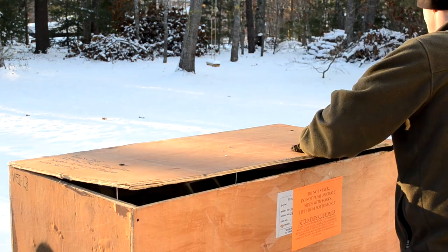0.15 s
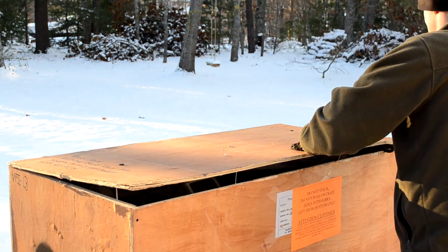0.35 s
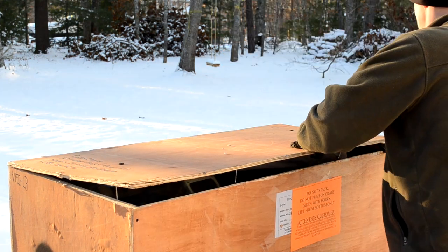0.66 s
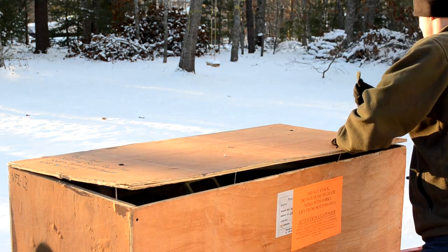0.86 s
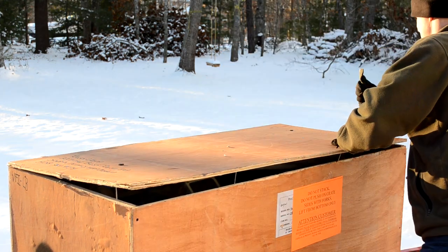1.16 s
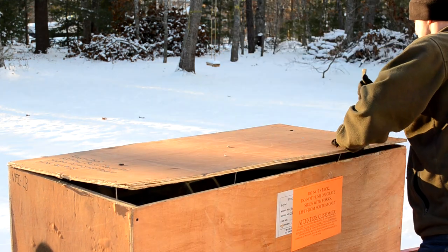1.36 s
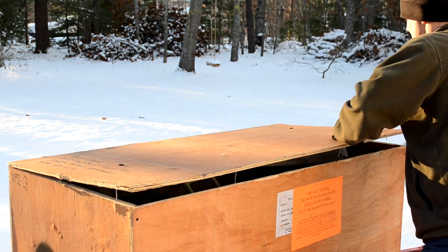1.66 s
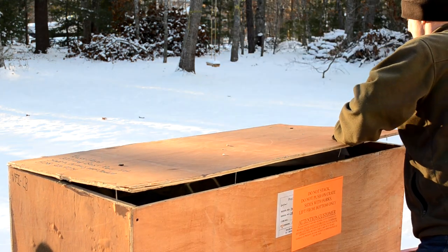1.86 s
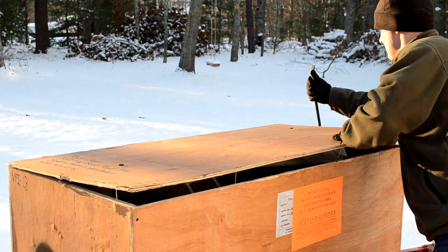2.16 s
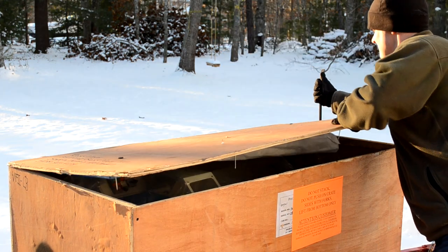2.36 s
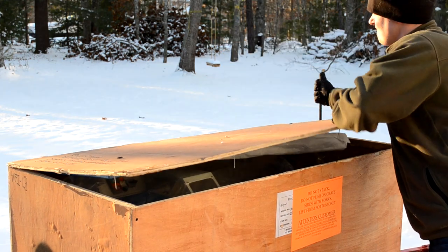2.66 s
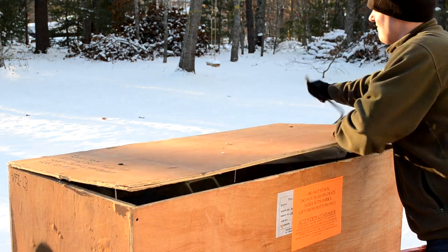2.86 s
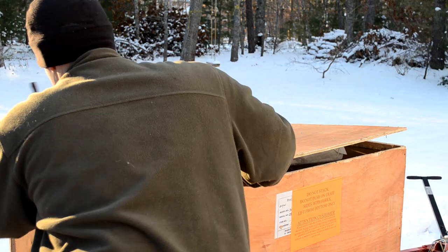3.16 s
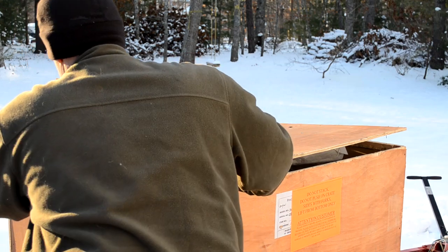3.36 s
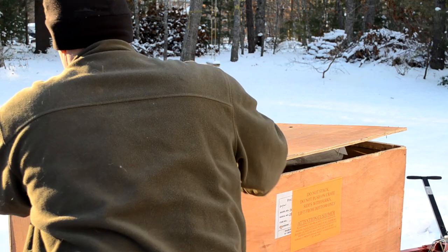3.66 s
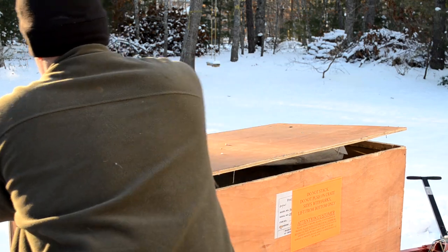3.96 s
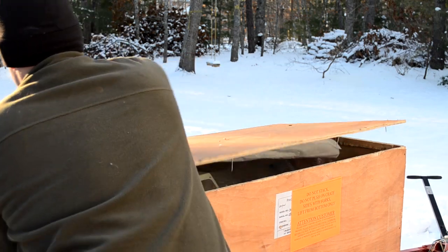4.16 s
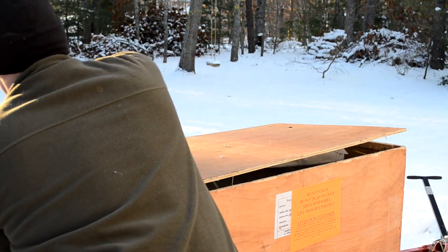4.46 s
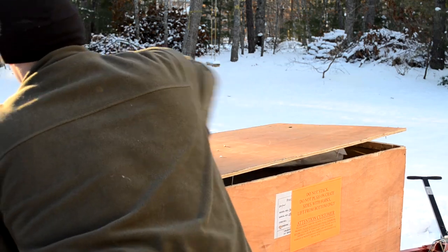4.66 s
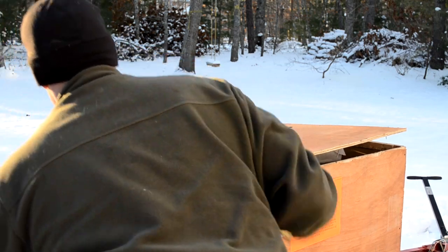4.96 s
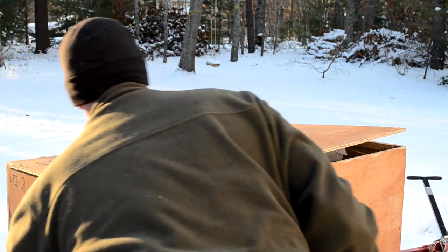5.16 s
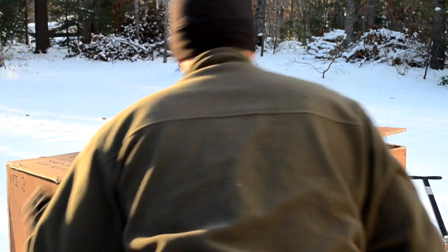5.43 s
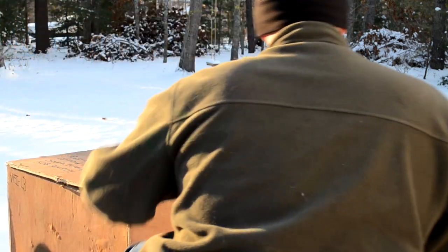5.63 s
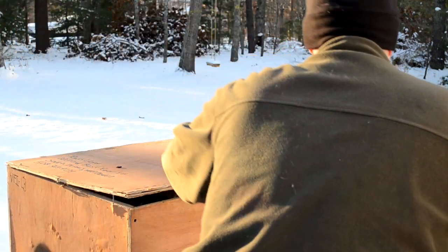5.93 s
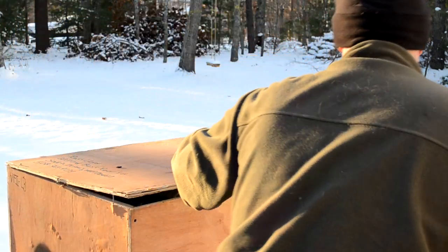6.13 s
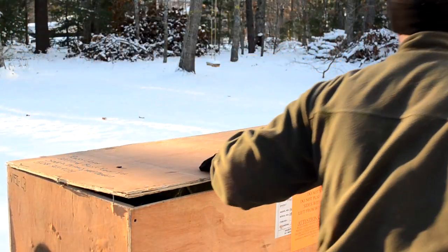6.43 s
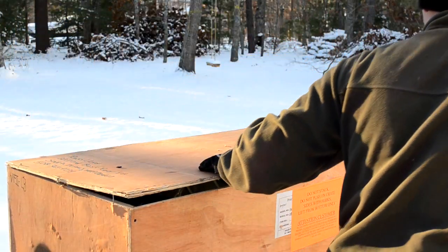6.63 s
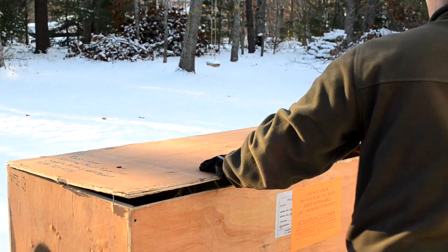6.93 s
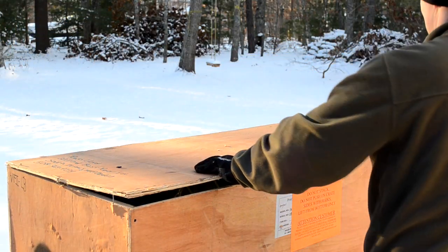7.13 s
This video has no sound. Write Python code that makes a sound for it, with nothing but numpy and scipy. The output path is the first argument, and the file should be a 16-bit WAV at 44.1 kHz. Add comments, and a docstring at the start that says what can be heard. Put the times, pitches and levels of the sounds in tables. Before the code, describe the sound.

Hollow wooden knocks, short creaking groans and gritty rubbing come from a large box lid being levered, close to a single mono microphone outdoors. The work comes in uneven bursts with pauses, over soft distant tyre roar. Late on, a metal bar slams onto the loose lid, clanks and bounces rapidly, making it rattle; a short dull tail fades into quiet handling taps.

```python
"""Prying a crate lid

A steel bar pries a plywood lid loose in a yard: knocks ring boom and panel modes, with noise cracks.
Slipping nails groan as uneven low tones and squeak as wavering sines; scrapes are grains of friction noise.
The bar drops on the lid, bounces and rings in sine modes while the loose lid chatters as lumpy noise.
A distant car swells and fades as coloured noise; crate walls and trees scatter back a dull noise tail.
"""
import sys
import numpy as np
from scipy import signal
from scipy.fft import rfft, irfft, next_fast_len
from scipy.io import wavfile
from scipy.ndimage import uniform_filter1d

SR = 44100
rng = np.random.default_rng(int(sys.argv[2]) if len(sys.argv) > 2 else 0)


def transcribe(signal):
    """Save signal, clipped to [-1, 1], as a 16-bit WAV file at the path in sys.argv[1]."""
    frames = np.atleast_2d(signal).T
    limited = np.clip(frames, -1, 1)
    pcm = np.round(limited * 32767).astype(np.int16)
    wavfile.write(sys.argv[1], SR, pcm)


N = 321489


def undb(db):
    """Decibels to amplitude ratio."""
    return 10 ** (np.asarray(db) / 20)


def unit(x):
    """Scale to rms 1."""
    return x / np.sqrt(np.mean(x ** 2))


def peak(x, db):
    """Scale to a peak level in dB."""
    return x * undb(db) / np.max(np.abs(x))


def noise(length=N):
    """White noise."""
    return rng.standard_normal(length)


def colour(x, shape):
    """Filter by (freq_hz, gain_db) points, log-frequency interpolated, -90 dB outside; rms 1."""
    point_hz, point_db = np.transpose(shape)
    size = next_fast_len(len(x))
    bin_hz = np.maximum(np.arange(size // 2 + 1) * SR / size, 1)
    gain_db = np.interp(np.log(bin_hz), np.log(point_hz), point_db, -90, -90)
    return unit(irfft(rfft(x, size) * undb(gain_db), size)[:len(x)])


def walk(rate_hz):
    """Random levels, one per 1 / rate_hz, joined by slews; spread a little under 1."""
    step = int(SR / rate_hz)
    held = np.repeat(noise(N // step + 1), step)
    return uniform_filter1d(held, step)[:N]


def fade(t60_s, length):
    """Exponential decay, 60 dB in t60_s."""
    return np.exp(-np.log(1000) * np.arange(length) / SR / t60_s)


def ring(modes, share_db, stretch, length, phase=0):
    """Decaying sines of one blow; modes are (freq_hz, level_db, t60_s), stretch scales t60_s."""
    t = np.arange(length) / SR
    out = np.zeros(length)
    for (hz, db, t60_s), share, start in zip(modes, share_db, phase + np.zeros(len(modes))):
        out += undb(db + share) * np.sin(2 * np.pi * hz * t + start) * fade(stretch * t60_s, length)
    return out


def add(out, start_s, x):
    """Mix x into out at start_s."""
    i = int(start_s * SR)
    out[i:i + len(x)] += x[:len(out) - i]


def swells(table, rise_db_s, fall_db_s, rest_db=-120):
    """Events (start_s, hold_s, level_db, ..) over a resting level; other columns are power-weighted means."""
    t = np.arange(0, N, 32) / SR
    start_s, hold_s, peak_db, *columns = np.array(table, float).T[:, :, None]
    rise_db = rise_db_s * np.maximum(start_s - t, 0)
    fall_db = fall_db_s * np.maximum(t - start_s - hold_s, 0)
    power = undb(2 * (peak_db - rise_db - fall_db)) + 1e-30
    total = power.sum(axis=0)
    slow = [10 * np.log10(total + undb(2 * rest_db))]
    slow += [(power * c).sum(axis=0) / total for c in columns]
    return [np.interp(np.arange(N) / SR, t, c) for c in slow]


# distant car: time_s, level_db
CAR_LEVEL = [(0, -48), (1, -52.5), (2, -53), (2.6, -50), (3, -45), (3.5, -40.5), (4, -38), (4.5, -39),
             (5, -41.5), (5.7, -43), (6.2, -43.5), (6.7, -46.5), (7.29, -45.5)]
# tyre roar spectrum: freq_hz, gain_db
ROAD_SPECTRUM = [(18, -52), (30, 3.5), (112, -16.5), (145, -14), (384, -14.5), (473, -12.5), (760, -4.5),
                 (1010, -7), (1280, -8), (3310, -37.5), (4080, -45.5), (12300, -63), (16000, -80)]
# quiet yard spectrum: freq_hz, gain_db
YARD_SPECTRUM = [(15, -39), (25, 4), (64, -30), (123, -22), (256, -12.5), (1020, -27), (1370, -10),
                 (2220, -28), (11000, -54), (16000, -53)]
YARD_DB = -60


def outdoors():
    """Tyre roar as coloured noise that swells and flickers, over steady yard noise."""
    time_s, level_db = np.transpose(CAR_LEVEL)
    car_db = np.interp(np.arange(N) / SR, time_s, level_db)
    road = undb(car_db + 1.0 * walk(3.066)) * colour(noise(), ROAD_SPECTRUM)
    return road + undb(YARD_DB) * colour(noise(), YARD_SPECTRUM)


# lid groans as a nail slips: start_s, hold_s, level_db, slip_hz, second_mode_db, roughness_0_1
NAIL_GROANS = [(0.0, 0.025, -45, 123, -2.5, 0.55), (0.18, 0.036, -50, 125, 12, 0.44),
               (0.335, 0.038, -40.5, 112, -1, 0.53), (0.4, 0.028, -48, 119.8, 4, 0.28),
               (0.47, 0.073, -38.5, 128, 1, .35), (0.6, .05, -46, 136.1, -8, 0.7),
               (0.71, 0.024, -53.5, 126, 4.5, 0.53), (0.88, 0.053, -41.5, 135.2, 4.5, 0.77),
               (0.97, 0.046, -50, 130, 0, .6), (1.06, 0.093, -46, 131.8, 0, 0.72),
               (1.3, 0.032, -51, 118.8, 3, 0.71), (1.44, .03, -49, 123, 1, 0.5),
               (1.525, 0.029, -30.5, 98.7, -4.5, 0.25), (1.575, .03, -17.5, 102.1, -5.5, 0.14),
               (1.66, 0.051, -35, 112.6, 0, 0.6), (1.73, 0.031, -31, 121, -7, .4),
               (1.8, 0.091, -48.5, 123, 2, 0.7), (2.0, 0.097, -60.5, 111.7, 3, 0.64),
               (2.2, .04, -54, 120, -1, 0.66), (2.33, 0.033, -33, 91.7, -11, 0.6),
               (2.388, 0.028, -23, 89.5, -25, 0.15), (2.48, 0.042, -35, 90.6, -22, 0.31),
               (2.6, 0.067, -48.5, 98, -20, 0.63), (2.765, 0.016, -27.5, 117.5, 2.5, 0.02),
               (2.9, 0.072, -46.5, 122.9, -8, 0.59), (3.1, .02, -34.5, 118, -6, 0.66),
               (3.21, .01, -38, 115.3, -4, 0.68), (3.26, .13, -48.5, 116.8, -2, 0.59),
               (3.55, 0.051, -60.5, 112, 12, .3), (3.66, 0.041, -49, 107.7, 1, 0.67),
               (4.14, .03, -37, 98, -12, .35), (4.22, .03, -36, 114, -9, 0.64),
               (4.3, .06, -33, 108.9, 5, 0.61), (4.4, .09, -40.5, 114.6, -0.5, 0.5),
               (4.55, .14, -49, 117.2, -9, 0.56), (4.75, 0.18, -48, 108, -15, 0.04),
               (5.62, .01, -48.5, 104, 5, 0.54), (5.99, .01, -57, 112, 7, .6),
               (6.37, .02, -51.5, 118, 6, 0.59)]
GROAN_RISE_DB_S, GROAN_FALL_DB_S, GROAN_REST_DB = 602, 378, -69


def flex():
    """Stick-slip at an uneven rate rocks the lid: a fundamental, its octave in the second mode, and rumble."""
    level_db, slip_hz, second_db, rough = swells(NAIL_GROANS, GROAN_RISE_DB_S, GROAN_FALL_DB_S, GROAN_REST_DB)
    rough = np.clip(rough, 0, 1)
    uneven_hz = slip_hz * (1 + 0.0955 * rough * walk(60))
    phase = 2 * np.pi * np.cumsum(uneven_hz) / SR
    low = colour(noise(), [(40, -2.5), (70, -14.0), (110, -3), (150, -5.5), (190, -17.5)])
    high = colour(noise(), [(150, 5), (200, 3.5), (235, -16.5), (300, 0), (450, -1), (600, -13)])
    clean = np.sqrt(2 * (1 - rough))
    first = clean * np.sin(phase) + np.sqrt(rough) * low
    second = clean * np.sin(2 * phase) + np.sqrt(rough) * high
    return undb(level_db) * (first + undb(second_db) * second)


# scrapes of edges, gloves and sleeves: start_s, hold_s, hiss_db, panel_share_db (relative to hiss)
RUBS = [(0.0, 0.014, -56.5, 11), (0.18, 0.17, -61, 8), (0.49, 0.0064, -53.5, 7), (0.7, 0.017, -58.5, 14.5),
        (0.88, 0.013, -63.5, 16.5), (1.45, 0.09, -56.5, 9), (1.59, 0.028, -45, 17),
        (1.72, 0.018, -62.5, 27), (2.27, .03, -60, 8.5), (2.33, 0.043, -52, 10.5), (2.42, 0.099, -55.5, 10),
        (2.78, 0.008, -54, 9.5), (3.06, .3, -66.5, 22), (3.56, 0.026, -52, 10.5), (3.78, 0.0082, -57, 9),
        (4.18, .01, -52, 16.5), (4.31, .02, -47, 21.5), (4.96, 0.0083, -55.5, 11), (6.0, 0.033, -68, 13),
        (6.38, 0.0096, -64, 4), (6.53, 0.019, -71.5, 14), (6.83, 0.049, -60, 11.5), (7.14, .05, -63.5, 13)]
# friction spectra, hiss, air and through the panel: freq_hz, gain_db
HISS_SPECTRUM = [(1200, -44), (2200, 7), (3000, 7), (4500, -6), (6500, -34)]
AIR_SPECTRUM = [(4000, -4), (6000, 7.5), (10000, 3), (13000, 1), (16000, -30)]
BODY_SPECTRUM = [(200, 12), (500, 13), (1200, 9.5), (2000, 4.5), (3500, -45.5)]
SCRAPE_RISE_DB_S, SCRAPE_FALL_DB_S, SCRAPE_REST_DB = 218, 172, -74
AIR_DB = -14.5  # relative to hiss


def rub():
    """Dense uneven grains of friction, heard as hiss and through the panel."""
    hiss_db, body_db = swells(RUBS, SCRAPE_RISE_DB_S, SCRAPE_FALL_DB_S, SCRAPE_REST_DB)
    grain_db = 3.8 * np.minimum(rng.exponential(size=N), 6)
    grains = noise() * undb(grain_db) * undb(0.83 * walk(120))
    hiss = colour(grains, HISS_SPECTRUM)
    air = undb(AIR_DB) * colour(grains, AIR_SPECTRUM)
    body = undb(body_db) * colour(grains, BODY_SPECTRUM)
    return undb(hiss_db) * (hiss + air + body)


# knocks on the plywood: start_s, panel_db, boom_db, crack_db, splinter_db, boom_hz, panel_hz
LID_KNOCKS = [(0.176, -37, -38.5, -40.5, -54, 184, 972), (0.187, -32, -61, -37.5, -73, 264, 630),
              (0.24, -47, -49, -44, -71, 256, 622), (0.373, -44, -45, -45.5, -57, 100, 978),
              (0.409, -38, -43, -52, -76, 237, 1030), (0.475, -34.5, -41, -44, -59, 153, 1030),
              (0.51, -40, -36, -49, -70, 145, 767), (0.659, -31.5, -44, -32, -48.5, 152, 935),
              (0.699, -32, -56, -24, -39, 430, 775), (0.846, -30, -35.5, -36, -63, 133, 605),
              (0.881, -33, -35, -49, -68, 378, 872), (0.965, -43, -48, -39, -54, 162, 861),
              (1.050, -28.5, -41, -40, -82, 141.6, 562), (1.276, -47, -49, -61, -75, 341, 762),
              (1.437, -44, -51, -38.5, -58, 423, 1660), (1.444, -32, -49, -32, -48.5, 136, 1840),
              (1.519, -30, -39, -34, -51, 97.6, 830), (1.583, -30, -26, -30, -65, 106, 549),
              (1.647, -15.5, -30.5, -31.5, -45, 282, 813), (1.654, -14.5, -42, -34, -46, 148.5, 930),
              (1.679, -23, -36, -45, -60, 243, 869), (1.703, -23, -32.5, -33, -71, 120, 732),
              (1.741, -26, -32.5, -37, -73, 113, 907), (2.012, -49, -60, -50, -58, 199, 1345),
              (2.15, -42.5, -63, -47.5, -65, 359, 1182), (2.199, -40, -50, -37.5, -45, 126, 1317),
              (2.314, -19, -34, -20.5, -47, 481, 933), (2.345, -31, -40, -44, -52, 99.6, 963),
              (2.378, -49, -32, -35, -53, 94, 1363), (2.433, -44, -40.5, -38, -57, 128, 2045),
              (2.552, -37.5, -43, -40.5, -57, 83.7, 624), (2.702, -46, -54, -49, -60, 135, 850),
              (2.745, -32, -30, -50, -64, 240, 654), (2.761, -20.5, -26, -29.5, -37.5, 446, 642),
              (2.803, -49, -42, -45, -58, 240, 854), (2.826, -51, -38, -49, -62, 470, 956),
              (2.883, -55, -47, -47, -62, 248.4, 725), (2.946, -35, -47, -47.5, -52, 92, 978),
              (3.032, -33, -40.5, -43, -75, 277, 746), (3.071, -24.5, -32.5, -44, -60, 256, 700),
              (3.082, -20.5, -32.5, -50, -76, 279, 799), (3.199, -43, -35.5, -48, -75, 114, 678),
              (3.54, -48, -46, -46, -52, 232, 990), (3.575, -33, -44, -37, -58, 227, 984),
              (3.632, -40, -38.5, -62, -76, 249.6, 716), (4.156, -30, -41, -34, -42.5, 103.2, 966),
              (4.207, -28, -40, -43, -45, 121.8, 1156), (4.259, -39, -47, -39, -45.5, 172.5, 950),
              (4.272, -21, -28, -36, -60, 392, 867), (4.301, -17, -44, -30.5, -44, 110, 645),
              (4.346, -17, -27.5, -30.5, -68, 122, 622), (4.369, -29, -26.5, -49, -68, 101.8, 844),
              (5.285, -4, -10, -22.5, -48, 251, 608), (5.31, -3, -15.5, -15, -28, 347, 1070),
              (5.321, -11, -22, -23, -25, 207, 894), (5.344, -0.5, -16.5, -18, -36, 270, 1060),
              (5.447, -12, -26, -24, -30.5, 215, 761), (5.462, 0, -13.5, -33, -51, 281.6, 748),
              (5.507, -17, -23, -27.5, -43, 229, 552), (5.552, -0.5, -25, -22, -43, 331, 1500),
              (6, -39, -43.5, -59, -64, 304, 719), (6.057, -42, -50, -58, -70, 415, 1021),
              (6.169, -45, -50.5, -49, -53, 312, 1210), (6.364, -32.5, -38.5, -41, -54, 280, 795),
              (6.752, -37.5, -67, -60, -81, 384.8, 1020)]
# lid modes, low and upper: freq_hz, level_db, t60_s (before RING_STRETCH)
BOOM_MODES = [(75, -19, 0.2), (91, 0, 0.07), (111, -28, 0.092), (153, -8.5, 0.12), (175, -12.5, .12),
              (228, -2.5, 0.22), (254.8, 1, 0.2), (292, -1, 0.19), (351.4, -2, 0.16), (396, -1, 0.12),
              (469.5, -4.5, 0.31)]
PANEL_MODES = [(539, -9, 0.083), (649, -11.5, 0.1), (742, -10.5, 0.13), (867, -12, 0.17),
               (963.5, -2, 0.038), (1059, -15, 0.16), (1123, -0.5, 0.039), (1212, -15, 0.16),
               (1347, -0.5, 0.056), (1390, -10, 0.055), (1469.7, 1, 0.027), (1634, 0.5, 0.021),
               (1810, -13, 0.07), (1844, -29, 0.03)]
RING_STRETCH = 0.79  # scales the ring times of the wood
PUSH_S, SCUFF_S = 0.0006, 0.00254  # contact of steel on wood; decay constant of its slide
DENSE_SHARE = 0.17  # amplitude of the many close modes, relative to the panel peak
DENSE_T60_S, CRACK_T60_S = RING_STRETCH * 0.19, RING_STRETCH * 0.045
SPLINTER_T60_S = 0.016
CRACK_AT_0_DB_HZ, CRACK_HZ_PER_DB, CRACK_SCATTER = 3034, 18.5, 0.1  # harder cracks bite higher


def knocks():
    """Each knock strikes another spot, so modes come in new shares; a short crack leads."""
    out, length, head = np.zeros(N), SR // 4, SR // 50
    crack_noise = colour(noise(), [(1500, 9), (2200, -0.5), (3200, -0.5), (5500, -11)])
    splinter_noise = colour(noise(), [(4000, 1), (5500, 18.8), (10000, 8), (16000, 2)])
    dense_noise = colour(noise(), [(300, -12), (450, 3.5), (1000, 3), (1700, -21), (2600, -8.5)])
    patter = 0.24 * noise()
    push = np.hanning(int(PUSH_S * SR) + 3)
    onset = np.minimum(np.arange(length) / (PUSH_S * SR), 1)
    boom_mode_hz, panel_mode_hz = np.array(BOOM_MODES)[:, 0], np.array(PANEL_MODES)[:, 0]
    panel_count = len(PANEL_MODES)
    for start_s, panel_db, boom_db, crack_db, splinter_db, boom_hz, panel_hz in LID_KNOCKS:
        i = int(start_s * SR)
        chance = noise(panel_count + len(BOOM_MODES))

        # modes near the pitch of the struck spot ring loudest; upper modes start inward or outward
        panel_share_db = 3 * chance[:panel_count] - 9 * np.abs(np.log2(panel_mode_hz / panel_hz))
        start_phase = np.pi * (chance[-panel_count:] > 0)
        panel = ring(PANEL_MODES, panel_share_db, RING_STRETCH, length, start_phase)
        boom_share_db = 2 * chance[panel_count:] - 12 * np.abs(np.log2(boom_mode_hz / boom_hz))
        boom = ring(BOOM_MODES, boom_share_db, RING_STRETCH, length)
        boom = boom * undb(boom_db) / np.std(boom[:head])

        # sliding contact: a first push, then a dying patter of weaker ones
        scuff = patter[i:i + head] * np.exp(-np.arange(head) / (SCUFF_S * SR))
        scuff[0] = 1
        panel = signal.fftconvolve(panel, np.convolve(scuff, push))
        dense = np.convolve(dense_noise[i:i + length] * fade(DENSE_T60_S, length), push)

        crack_hz = CRACK_AT_0_DB_HZ + CRACK_HZ_PER_DB * crack_db
        crack_hz *= 1 + CRACK_SCATTER * np.tanh(rng.standard_normal())
        raw_crack = crack_noise[i:i + length]
        bite = signal.lfilter(*signal.iirpeak(crack_hz, 3.5, fs=SR), raw_crack)
        crack = unit(bite + 0.27 * raw_crack) * onset * fade(CRACK_T60_S, length)
        splinter = splinter_noise[i:i + length] * fade(SPLINTER_T60_S, length)

        add(out, start_s, peak(panel, panel_db))
        add(out, start_s, peak(dense, panel_db) * DENSE_SHARE)
        add(out, start_s, np.convolve(boom, push / push.sum()))
        add(out, start_s, crack * undb(crack_db))
        add(out, start_s, splinter * undb(splinter_db))
    return out


# nail squeaks: start_s, hold_s, level_db, top_hz
NAIL_SQUEAKS = [(.39, 0.054, -46, 1018), (.79, 0.042, -45, 1030)]
SQUEAK_RISE_DB_S, SQUEAK_FALL_DB_S = 899, 898
SQUEAK_SAG_PER_DB = 0.1  # share of top_hz lost per dB below the loudest


def squeak():
    """A rough, wavering near-sine; the pitch arches with the level."""
    level_db, top_hz = swells(NAIL_SQUEAKS, SQUEAK_RISE_DB_S, SQUEAK_FALL_DB_S)
    below_top_db = np.maximum(level_db - level_db.max(), -40)
    hz = top_hz * (1 + SQUEAK_SAG_PER_DB * below_top_db)
    grip = undb(6 * walk(150))
    waver = 1 + 0.04 * walk(150)
    return undb(level_db) * grip * np.sin(2 * np.pi * np.cumsum(hz * waver) / SR)


# dropped bar lands and bounces: start_s
BAR_LANDINGS = [5.310, 5.344, 5.461, 5.552]
# steel bar modes: freq_hz, t60_s, landing_1_db, landing_2_db, landing_3_db, landing_4_db
BAR_MODES = [(612, 1.2, -29, -43, -33, -33), (1092, 0.7, -22, -23, -26, -41),
             (1682, 0.5, -28, -34, -31, -48), (2045, 0.5, -38, -42, -31, -43),
             (2488, 0.5, -40, -33, -44, -59), (3344, 0.55, -26, -31, -43, -66),
             (3510, 0.25, -59, -51, -42, -44), (4965, 0.45, -41, -49, -52, -68),
             (5087, 0.42, -48, -48, -58, -74), (6086, 0.45, -39, -46, -58, -79),
             (6680, 0.43, -57, -54, -50, -66), (6837, 0.5, -32, -37, -52, -72),
             (8402, 0.55, -45, -57, -50, -52), (8510, 0.5, -57, -72, -63, -60),
             (9062, 0.6, -51, -48, -53, -66), (9524, 0.45, -35, -49, -54, -48),
             (11098, 0.6, -65, -51, -53, -71), (12097, 0.6, -39, -44, -48, -81),
             (12405, 0.55, -57, -48, -53, -82), (13259, 0.5, -45, -45, -63, -85),
             (13426, 0.38, -51, -46, -58, -64), (15277, 0.44, -53, -59, -68, -68),
             (15615, 0.4, -56, -65, -73, -75)]


def bar():
    """Every landing stops the ring so far and sets the steel ringing in new shares."""
    out = np.zeros(N)
    for k, start_s in enumerate(BAR_LANDINGS):
        out[int(start_s * SR):] = 0
        modes = [(row[0], row[2 + k], row[1]) for row in BAR_MODES]
        add(out, start_s, ring(modes, np.zeros(len(modes)), 1, SR))
    return out


# whole-lid rattle spectrum: freq_hz, gain_db
LID_SPECTRUM = [(60, -8), (120, 2), (250, 1), (450, -5), (900, -2.5), (1500, -11), (2500, -16.5),
                (4500, -46), (7000, -57)]
CHATTER_DB, CHATTER_HOLD_S, CHATTER_RISE_DB_S, CHATTER_FALL_DB_S = -27, 0.029, 2000, 202


def chatter():
    """Lumpy noise rattle through the whole loose lid, shaken up by every landing of the bar."""
    events = [(start_s, CHATTER_HOLD_S, CHATTER_DB) for start_s in BAR_LANDINGS]
    level_db, = swells(events, CHATTER_RISE_DB_S, CHATTER_FALL_DB_S)
    return undb(level_db + 2.7 * walk(83)) * colour(noise(), LID_SPECTRUM)


TREES_T60_S, TREES_DB = 0.49, -24.5


def scatter(work):
    """Crate walls and trees scatter back a dull tail: convolution with fading coloured noise."""
    tail = colour(noise(SR), [(60, -31.5), (300, -14.0), (1500, -4), (5000, -9.0), (12000, -57)])
    tail = tail * fade(TREES_T60_S, SR)
    tail = tail / np.sqrt(np.sum(tail ** 2))
    return undb(TREES_DB) * signal.fftconvolve(work, tail)[:N]


def scene():
    """Work on the lid with its scattered tail, over the outdoors; one channel."""
    work = flex() + rub() + knocks() + squeak() + bar() + chatter()
    return (work + scatter(work) + outdoors())[None]


BASS_HZ, TOP_HZ = 73, 16000


def record(dry):
    """The microphone drops the deep bass, the loudest peaks clip, the top is cut."""
    bass_cut = signal.butter(3, BASS_HZ, "high", fs=SR, output="sos")
    top_cut = signal.ellip(8, 0.2, 70, TOP_HZ, fs=SR, output="sos")
    thin = signal.sosfilt(bass_cut, dry)
    return signal.sosfilt(top_cut, np.clip(thin, -0.92, 0.92))


dry = scene()
out = record(dry)
transcribe(out)
```